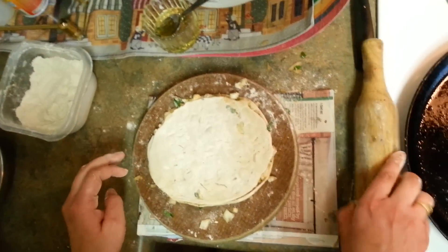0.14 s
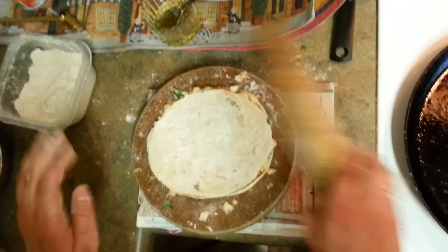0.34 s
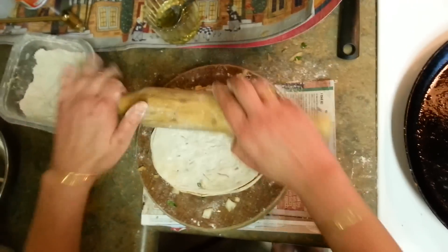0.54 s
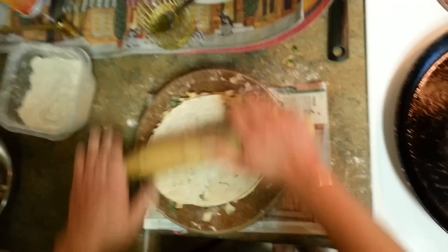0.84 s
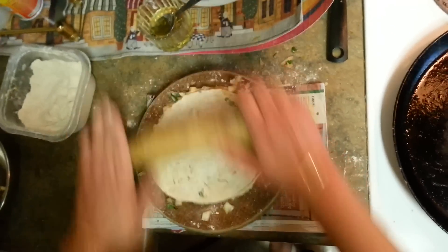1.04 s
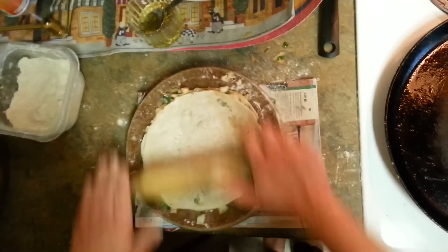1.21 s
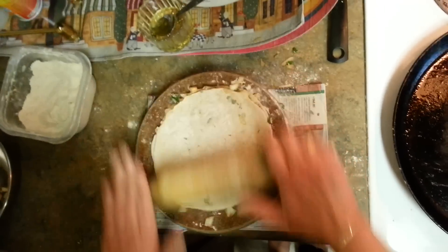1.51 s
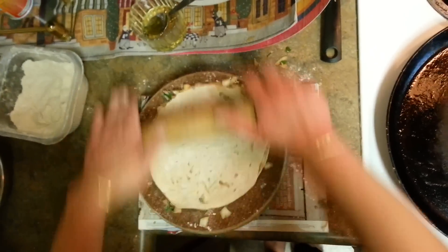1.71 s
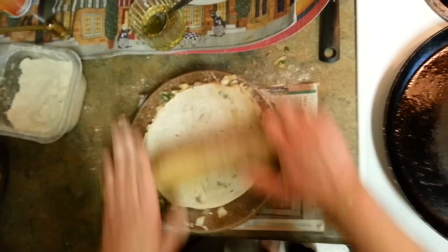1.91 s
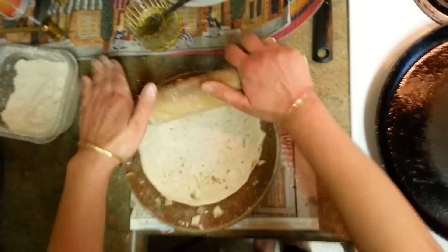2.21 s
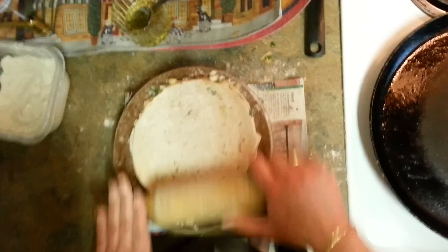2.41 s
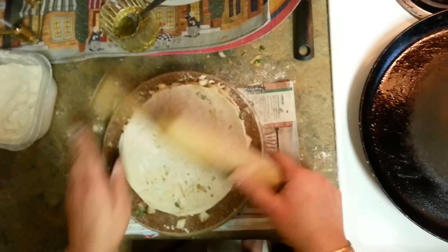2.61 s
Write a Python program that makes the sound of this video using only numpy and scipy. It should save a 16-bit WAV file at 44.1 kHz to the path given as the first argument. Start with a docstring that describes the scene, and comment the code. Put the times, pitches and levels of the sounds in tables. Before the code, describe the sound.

A wooden rolling pin works dough on a board. It scrapes and bumps over the counter from 0.1 s, giving a sharp, bright double clack near 0.27 s, quickly damped by the hand. From about 0.5 s to the end, dry palm hisses swell every 0.2 s over low rumble. The board thumps strongly at 0.7 s, softer at 1.1, 1.5 and 2.35 s. Close, small room, faint hum.

```python
"""On a kitchen counter in a small room, a wooden rolling pin is dragged off with a clack and rolled on dough.
Dragging is stick-slip noise that excites the pin's modes; clacks, bumps and thumps are sums of damped modes.
Each rolling stroke has a hand speed that drives the dry hiss of the palms and the rumble of a round board,
which rocks and thumps on the counter. Diffuse echoes, soft air noise and a faint hum surround it."""
import sys
import numpy as np
from scipy import signal
from scipy.fft import rfft, irfft
from scipy.io import wavfile
from scipy.ndimage import uniform_filter1d

SR = 44100
rng = np.random.default_rng(int(sys.argv[2]) if len(sys.argv) > 2 else 0)


def put_to_file(sound):
    """Save the sound as 16-bit audio at rate SR, in the file named by the first command-line argument."""
    columns = np.atleast_2d(sound).T  # one column per channel
    safe = np.clip(columns, -1, 1)
    whole_steps = np.round(safe * 32767)
    wavfile.write(sys.argv[1], SR, whole_steps.astype(np.int16))


N = 121275

# A balance_db is left minus right. Event and mode levels are relative to their source's level.

# spectrum of the still air: frequency_hz, density_db (per Hz)
AIR_SPECTRUM = [(25, -37), (58, 5.5), (90, -13.5), (160, 6), (220, -3.5), (310, 5), (450, -7), (900, -15),
                (2000, -29), (7000, -36.5), (14000, -24)]
# partials of the hum: frequency_hz, level_db (rms, before the waver)
HUM_PARTIALS = [(163, -61.5), (310, -66)]
AIR_DB = -56.5

# loudness of the pin dragged over the counter: time_s, level_db
DRAG_LEVEL = [(0, -69), (.075, -49.5), (.1, -53.5), (.13, -39), (.16, -44.5), (.195, -37), (.23, -43.5),
              (.26, -44.5), (.29, -42), (.315, -45.5), (.35, -38), (.40, -53.5), (.45, -51.5), (.51, -62.5),
              (.56, -49), (.66, -63), (.7, -68)]
# spectrum of the dragging friction: frequency_hz, density_db (per Hz)
DRAG_SPECTRUM = [(30, -34), (100, -17), (170, -2.5), (240, 3), (340, -5.5), (560, -10), (720, -5),
                 (950, -13.5), (1650, -14.5), (2000, -20), (2450, -15.5), (3200, -20.5), (7000, -22),
                 (13000, -40)]
SLIPS_PER_S, SLIP_SPREAD_DB, SLIP_DB, SLIP_RING_DB = 700, 2, -6.5, -22.5

# contacts of the pin with the counter: start_s, level_db, brightness_db_per_octave
CLACK_EVENTS = [(.05, -37, -10), (.12, -39, 2.5), (.193, -31, -8), (.209, -23.5, -9), (.2662, 1, 0.5),
                (.2735, -18, 13), (.2815, -6, 1), (.2885, -8.5, 2), (.338, -15.5, -12)]
# vibration modes of the pin: frequency_hz, level_db, t60_s, balance_db
PIN_MODES = [(1349, -9, 0.033, 21), (1593, 4.5, 0.069, 1), (1673, -2.5, 0.16, 7.5), (1635, -24, .07, 4),
             (2175, -11, .08, -4), (2330, -4.5, 0.18, 9.5), (2460, 3, 0.14, -4), (2469, -1, 0.15, 3.5),
             (2542, 0, .07, 14), (3531, -6, 0.048, 4), (4140, -34.5, .04, -3.5), (4730, -17, 0.065, 11),
             (4936, -3, 0.041, 17.5), (4997, -0.5, 0.078, 7), (8140, -15, 0.018, -13),
             (9750, -23.5, 0.035, -11)]
# spectrum of the crack at each contact: frequency_hz, density_db (per Hz)
CRACK_SPECTRUM = [(600, -35), (1000, -14), (1350, 15.5), (2000, -5), (3500, 5), (5000, -4.5), (8000, -7.5),
                  (12500, -16), (14000, -33)]
CLACK_DB, CLACK_BUILD_CYCLES, CLACK_LAG_S = -21.5, 5.1, 0.00008
CRACK_DB, CRACK_S, CRACK_BALANCE_DB = -24.5, 0.0016, 9
CHATTER_DB, CHATTER_S = -33.5, 0.01  # rough buzz of the wood after each contact
GRIP_S, GRIP_DB, GRIP_FADE_S = 0.299, -9.5, 0.002  # the hand closes on the pin and damps its ring

# soft bumps on the counter: start_s, level_db
BUMP_EVENTS = [(.083, -1.5), (.119, -1.5), (.139, 1), (0.226, -3), (0.285, 4), (0.347, -14)]
# vibration modes of the counter: frequency_hz, level_db, t60_s
COUNTER_MODES = [(126, -18.5, 0.18), (174, -4, 0.1), (216.5, -3, .08), (269, -9, 0.03), (686, -19.5, 0.24)]
BUMP_DB = -29.5

# light taps of fingers and pin: start_s, level_db
TAP_EVENTS = [(0.117, -47), (0.21, -39), (0.536, -45.5), (.678, -29.5), (.925, -37), (1.08, -41.5),
              (1.261, -57), (1.398, -38.5), (1.491, -42.5), (2.349, -39.5)]
# spectrum of a tap: frequency_hz, density_db (per Hz)
TAP_SPECTRUM = [(150, -34), (500, 4), (1000, 3.5), (2000, 0), (3500, -10), (10000, -32)]
TAP_S = 0.0063

# brief brushes of skin and flour: start_s, level_db, decay_s, balance_db, top_hz, rise_s
BRUSH_EVENTS = [(0.163, -39, 0.068, 1, 7100, 0.0017), (.245, -28.5, 0.027, 2, 8140, 0.014),
                (0.335, -39.5, 0.015, 13, 5930, .005), (.551, -35.5, 0.017, -7.5, 14300, 0.0024),
                (1.261, -38, 0.024, -2, 14000, 0.0048), (1.342, -31, 0.023, -14, 12000, .004)]
# spectra of the palm hiss towards each side: frequency_hz, density_db (per Hz)
LEFT_HISS_SPECTRUM = [(300, -15.5), (750, -19), (1080, -9.5), (1400, -25.5), (1630, -6), (1900, -14),
                      (2250, -8), (2470, -2.5), (2800, -6), (3600, -6.5), (4300, -1), (5100, 2),
                      (6800, -2.5), (8200, -6), (9500, -9.5), (12500, -11.5), (14500, -19)]
RIGHT_HISS_SPECTRUM = [(300, -53), (750, -42), (1080, -18), (1400, -56.5), (1630, -17.5), (1900, -20.5),
                       (2470, -19), (2900, -19), (4000, -16), (5000, -13), (6100, -11.5), (7100, 1),
                       (8000, -4), (9000, -10.5), (10500, -14.5), (14500, -22.5)]
GRAIN_DB, GRAINS_PER_S, GRAIN_SPREAD_DB = -2.5, 4600, 1.5
SKIN_BALANCE_DB = -2.5
NEAR_DB, NEAR_S = -7.5, 0.003  # reflections from things close by

# strokes of the pin: start_s, length_s, hiss_db, rumble_db, balance_db, fastest_point (share of stroke)
STROKE_EVENTS = [(0.465, 0.2, -20.5, -18.5, 3, 0.32), (0.638, 0.24, -3.5, 2.5, -0.5, 0.46),
                 (0.858, 0.21, 0, 3, 0.5, 0.58), (1.044, 0.22, -2.5, -0.5, 0.5, 0.6),
                 (1.272, 0.2, 2, -0.5, -1, 0.49), (1.467, 0.22, -2, 2, -0.5, 0.51),
                 (1.677, 0.22, 2, 1.5, 0, .52), (1.887, 0.25, 1, 3.5, 0, 0.4),
                 (2.089, 0.25, 2, 1, -0.5, .47), (2.305, 0.22, 0.5, 2.5, -0.5, 0.46),
                 (2.414, .16, -5.5, -2.5, 2, 0.31)]
# hands resting on the pin: time_s, level_db
CONTACT_LEVEL = [(.46, -32), (.5, -20), (.56, -13), (.66, -13.5), (.87, -18), (1.25, -15.5), (1.5, -16.5),
                 (1.9, -21), (2.3, -17), (2.52, -14.5), (2.6, -37.5)]
# spectrum of the board's rumble: frequency_hz, density_db (per Hz)
RUMBLE_SPECTRUM = [(22, -52), (38, -13.5), (56, 4.5), (75, 1), (95, -7.5), (120, -5), (190, -9),
                   (310, -11.5), (430, -21.5), (700, -24.5), (1500, -25.5), (4000, -64)]
HISS_EXPONENT, RUMBLE_EXPONENT = 2.46, 0.7  # powers of hand speed
HISS_DB, RUMBLE_DB, REST_RUMBLE_DB, ROLL_RING_DB = -32.5, -42.5, -9.5, -23

# thumps of the board: start_s, level_db, brightness_db_per_octave, deep_bass_db
THUMP_EVENTS = [(.6848, -0.5, 0.5, 4), (1.0869, -13, -3, -2), (1.4978, -6.5, -1.5, -3),
                (2.28, -17, -9.5, -10), (2.356, -8, -3, -8)]
# vibration modes of the board: frequency_hz, level_db, t60_s, lag_s
BOARD_MODES = [(62.6, -3.5, 0.15, 0.0165), (78.3, 4.5, 0.056, 0.0137), (126.6, 0.5, 0.099, .0075),
               (240, -3, 0.085, 0), (315.1, 4, 0.071, 0.00039), (348.5, -5.5, 0.16, 0),
               (443.7, -10.5, 0.11, 0.00028), (624, -14, 0.048, 0.003), (703.5, -14, 0.064, 0.0053),
               (869, -19.5, 0.15, 0), (1040, -24.5, 0.082, 0)]
THUMP_DB, THUMP_BALANCE_DB, DEEP_HZ = -17, 3.5, 90
BUILD_CYCLES = 0.4  # shared by thumps and bumps

ROOM_T60_S, ROOM_TREBLE_T60_S, ROOM_GAP_S, ROOM_LOW_HZ = 0.36, 0.14, 0.0095, 168
RUB_ROOM_DB, THUMP_ROOM_DB, CLACK_ROOM_DB = -9.5, -13, -12
LOW_CUT_HZ, TOP_HZ = 38.3, 14450


def undb(db):
    """Decibel law: amplitude ratio of a level."""
    return 10 ** (np.asarray(db) / 20)


def unit(x):
    """Normalisation to an rms of one."""
    return x / np.sqrt(np.mean(x ** 2) + 1e-20)


def seconds():
    """Time axis in seconds."""
    return np.arange(N) / SR


def pan(balance_db):
    """Level difference between ears: left and right gains."""
    return undb(np.array([[balance_db], [-balance_db]]) / 2)


def curve(points):
    """Envelope: gain interpolated in decibels over time."""
    return undb(np.interp(seconds(), *np.array(points).T))


def colour(x, points):
    """Spectral shaping: gain in decibels over log frequency, then rms one."""
    hz, db = np.array(points).T
    frequency = np.maximum(np.fft.rfftfreq(N, 1 / SR), 1)
    gain = undb(np.interp(np.log(frequency), np.log(hz), db))
    return unit(irfft(rfft(x) * gain, N))


def muffle(x, hz):
    """Gentle second-order low-pass."""
    return signal.sosfilt(signal.butter(2, min(hz, SR / 2 - 1000), fs=SR, output="sos"), x)


def wide_noise(split_hz=750):
    """Diffuse field: stereo noise alike in the bass and uncorrelated in the treble."""
    frequency = np.fft.rfftfreq(N, 1 / SR)
    mid, side = rfft(rng.standard_normal((2, N)))
    apart = frequency / np.hypot(frequency, split_hz)
    pair = np.array([mid + apart * side, mid - apart * side])
    return irfft(pair / np.sqrt(1 + apart ** 2), N)


def burst(start, rise, decay):
    """Transient envelope: exponential rise and fall with time constants in seconds."""
    age = np.maximum(seconds() - start, 0)
    return (1 - np.exp(-age / rise)) * np.exp(-age / decay)


def ring(start, hz, t60, cycles):
    """Damped oscillator: one mode builds up with a time constant in cycles and dies away."""
    out = np.zeros(N)
    first = max(int(start * SR), 0)
    age = np.maximum(np.arange(first, min(first + SR // 2, N)) / SR - start, 0)
    build_up = 1 - np.exp(-age * hz / cycles)
    decay = np.exp(-np.log(1000) * age / t60)
    out[first:first + len(age)] = np.sin(2 * np.pi * hz * age) * build_up * decay
    return out


def through(x, response):
    """Linear filtering: convolution with an impulse response scaled to unit mean energy."""
    return signal.fftconvolve(x, np.atleast_2d(unit(response)) / np.sqrt(N), axes=1)[:, :N]


def unevenness(rate, depth_db):
    """Amplitude modulation: held random levels, scaled by depth_db after smoothing."""
    size = int(SR / rate)
    held = rng.standard_normal(N)[np.arange(N) // size]
    return undb(depth_db * uniform_filter1d(held, size))


def slips(per_s, spread_db):
    """Stick-slip friction: random tiny clicks, a few much stronger than the rest."""
    strength_db = spread_db * np.minimum(rng.exponential(size=(2, N)), 4)
    sizes = rng.standard_normal((2, N)) * undb(strength_db)
    return unit((rng.random((2, N)) < per_s / SR) * sizes)


def pin_ring(x):
    """Forced resonance: friction sets the modes of the pin ringing."""
    response = sum(undb(db) * ring(0, hz, t60, 0.35) for hz, db, t60, _ in PIN_MODES)
    return through(x, response)


def background():
    """Steady sources: broadband air noise and the wavering sinusoids of an appliance hum."""
    hum = sum(undb(db) * np.sqrt(2) * np.sin(2 * np.pi * (hz * seconds() + rng.random()))
              for hz, db in HUM_PARTIALS)
    air = undb(AIR_DB) * colour(wide_noise(), AIR_SPECTRUM)
    return air + hum * unevenness(rate=8, depth_db=2.5)


def drag():
    """Sliding friction: the pin scrapes and judders over the counter, exciting its own modes."""
    judder = slips(SLIPS_PER_S, SLIP_SPREAD_DB)
    scrape = colour(wide_noise() + undb(SLIP_DB) * judder[0], DRAG_SPECTRUM)
    friction = scrape + undb(SLIP_RING_DB) * pin_ring(judder)
    return curve(DRAG_LEVEL) * friction * unevenness(rate=140, depth_db=0.5) * pan(3.9)


def clacks():
    """Impact excitation: each hard contact gives a noisy crack and rings the pin, until the hand grips it."""
    modes = np.zeros((2, N))
    cracks = np.zeros(N)
    for start, db, tilt_db in CLACK_EVENTS:
        for hz, mode_db, t60, balance_db in PIN_MODES:
            level_db = CLACK_DB + db + mode_db + tilt_db * np.log2(hz / 2400)
            modes += pan(balance_db) * undb(level_db) * ring(start, hz, t60, CLACK_BUILD_CYCLES)
        cracks += undb(CRACK_DB + db) * burst(start, 0.00024, CRACK_S)
        cracks += undb(CHATTER_DB + db) * burst(start, 0.001, CHATTER_S)
    left, right = modes * curve([(GRIP_S, 0), (GRIP_S + GRIP_FADE_S, GRIP_DB)])
    late_right = np.interp(seconds() - CLACK_LAG_S, seconds(), right)  # arrives later on the right
    crack_noise = cracks * colour(wide_noise(), CRACK_SPECTRUM)
    return np.array([left, late_right]) + pan(CRACK_BALANCE_DB) * crack_noise


def bumps():
    """Modal superposition: the dragged pin and the knuckles bump softly on the counter."""
    out = np.zeros(N)
    for start, db in BUMP_EVENTS:
        for hz, mode_db, t60 in COUNTER_MODES:
            out += undb(BUMP_DB + db + mode_db) * ring(start, hz, t60, BUILD_CYCLES)
    return pan(2) * out


def taps():
    """Brief impulses: fingers and pin give short bursts of shaped noise."""
    envelope = sum(undb(db) * burst(start, 0.00024, TAP_S) for start, db in TAP_EVENTS)
    return colour(wide_noise(), TAP_SPECTRUM) * envelope


def skin():
    """Granular friction: dry palms on floury wood hiss with countless slips, reflected by things close by."""
    rub = wide_noise() + undb(GRAIN_DB) * slips(GRAINS_PER_S, GRAIN_SPREAD_DB)
    reflections = through(rub, wide_noise() * burst(0.00033, 0.0012, NEAR_S))
    left, right = rub + undb(NEAR_DB) * reflections
    hiss = np.array([colour(left, LEFT_HISS_SPECTRUM), colour(right, RIGHT_HISS_SPECTRUM)])
    return hiss * pan(SKIN_BALANCE_DB)


def brushes():
    """Friction transients: hands brush past with short, low-passed swells of skin noise."""
    rub = skin()
    return sum(undb(db) * pan(balance_db) * burst(start, rise, decay) * muffle(rub, top_hz)
               for start, db, decay, balance_db, top_hz, rise in BRUSH_EVENTS)


def hand_speed(start, length, fastest):
    """Stroke kinematics: speed rises from rest, peaks at a share of the stroke and falls to rest."""
    peak = start + length * np.clip(fastest, 0.2, 0.8)
    phase = np.interp(seconds(), [start, peak, start + length], [0, np.pi / 2, np.pi])
    return np.abs(np.sin(phase))


def rolling():
    """Speed-dependent friction: powers of hand speed drive the palm hiss and the rumble of the board."""
    contact = curve(CONTACT_LEVEL)
    hiss_power = np.ones((2, 1)) * contact ** 2
    rumble_power = (undb(REST_RUMBLE_DB) * contact) ** 2
    for start, length, hiss_db, rumble_db, balance_db, fastest in STROKE_EVENTS:
        speed = hand_speed(start, length, fastest)
        hiss_power += (undb(hiss_db) * pan(balance_db) * speed ** HISS_EXPONENT) ** 2
        rumble_power += (undb(rumble_db) * speed ** RUMBLE_EXPONENT) ** 2
    palms = skin() + undb(ROLL_RING_DB) * pan(4.1) * pin_ring(wide_noise())  # the pin rings under them
    hiss = undb(HISS_DB) * np.sqrt(hiss_power) * palms * unevenness(rate=90, depth_db=1.5)
    rumble = undb(RUMBLE_DB) * np.sqrt(rumble_power) * colour(wide_noise(), RUMBLE_SPECTRUM) * pan(0.47)
    return hiss + rumble


def thumps():
    """Modal superposition: the board rocks onto the counter and rings, its lowest modes building up late."""
    out = np.zeros(N)
    for start, db, tilt_db, deep_db in THUMP_EVENTS:
        for hz, mode_db, t60, lag in BOARD_MODES:
            level_db = THUMP_DB + db + mode_db + tilt_db * np.log2(hz / 200) + deep_db * (hz < DEEP_HZ)
            out += undb(level_db) * ring(start + lag, hz, t60, BUILD_CYCLES)
    return pan(THUMP_BALANCE_DB) * out


def kitchen(x):
    """Reverberation: diffuse echoes of a small room, thin in the bass, whose treble dies first."""
    noise = wide_noise()
    low = muffle(noise, 1800)
    low_tail = low * burst(ROOM_GAP_S, 0.0052, ROOM_T60_S / np.log(1000))
    treble_tail = (noise - low) * burst(ROOM_GAP_S, 0.0052, ROOM_TREBLE_T60_S / np.log(1000))
    bass_cut = signal.butter(2, ROOM_LOW_HZ, "high", fs=SR, output="sos")
    return through(x, signal.sosfilt(bass_cut, low_tail + treble_tail))


def scene():
    """Superposition: direct sounds, their echoes and the background add."""
    rub = drag() + bumps() + taps() + brushes() + rolling()
    clack, thump = clacks(), thumps()
    echoes = kitchen(undb(RUB_ROOM_DB) * rub + undb(THUMP_ROOM_DB) * thump + undb(CLACK_ROOM_DB) * clack)
    return rub + thump + clack + echoes + background()


def record(dry):
    """Band limiting: a high-pass thins the deepest bass and a steep elliptic low-pass cuts the top."""
    thin = signal.sosfilt(signal.butter(3, LOW_CUT_HZ, "high", fs=SR, output="sos"), dry)
    return signal.sosfilt(signal.ellip(10, 0.2, 80, TOP_HZ, fs=SR, output="sos"), thin)


dry = scene()
out = record(dry)
put_to_file(out)
```